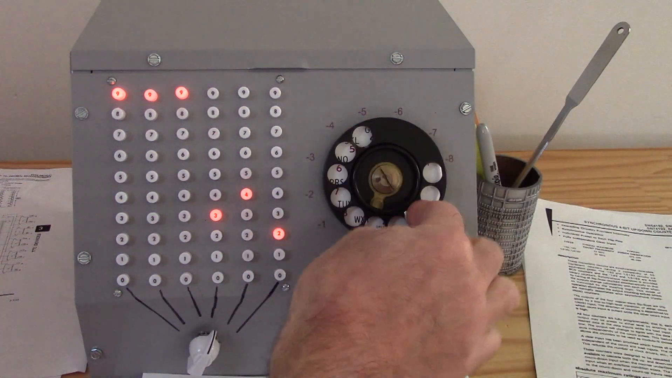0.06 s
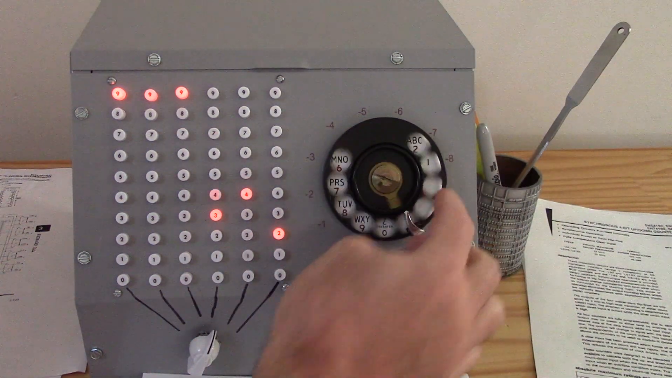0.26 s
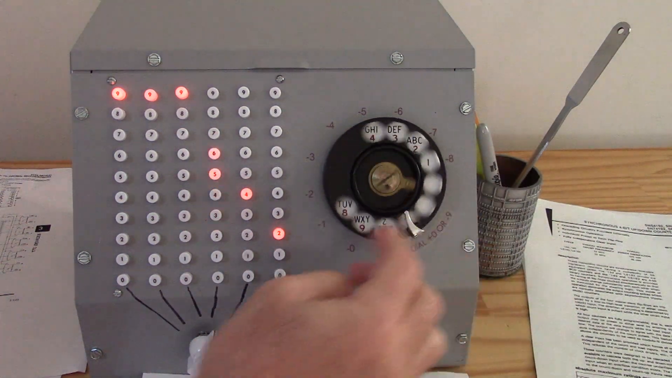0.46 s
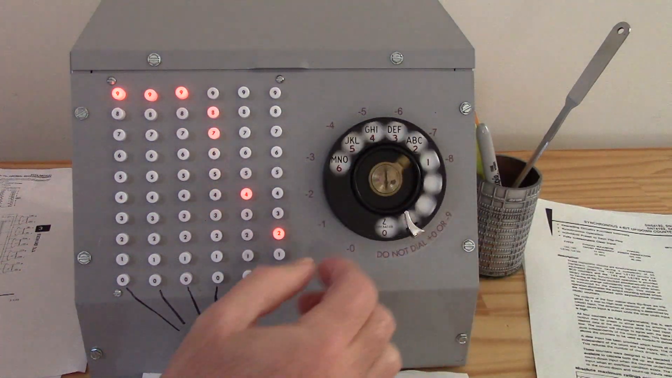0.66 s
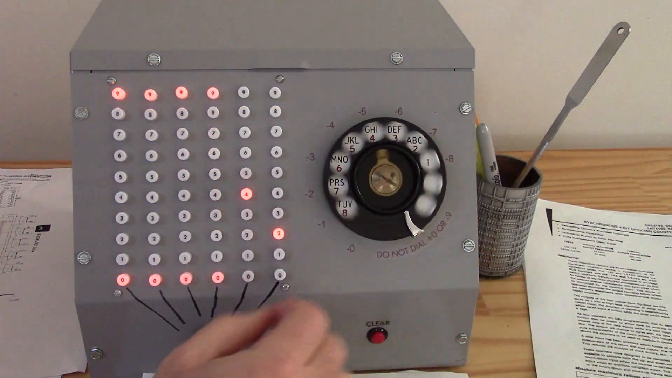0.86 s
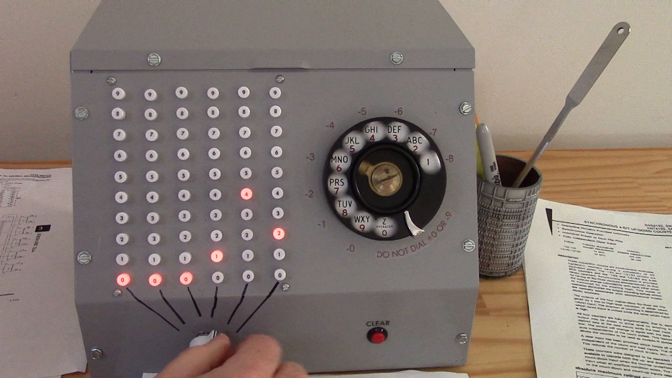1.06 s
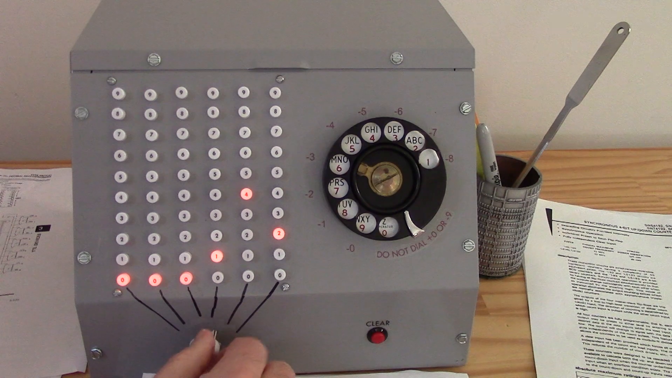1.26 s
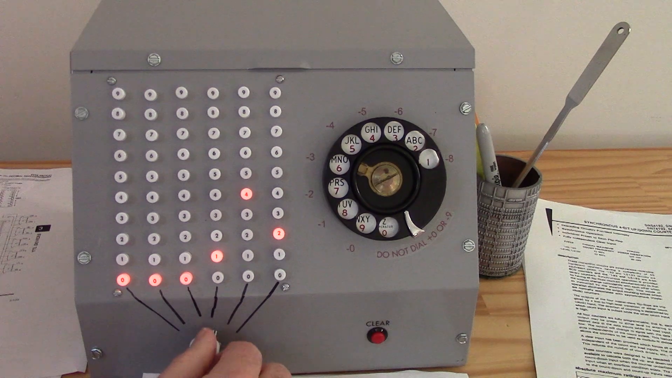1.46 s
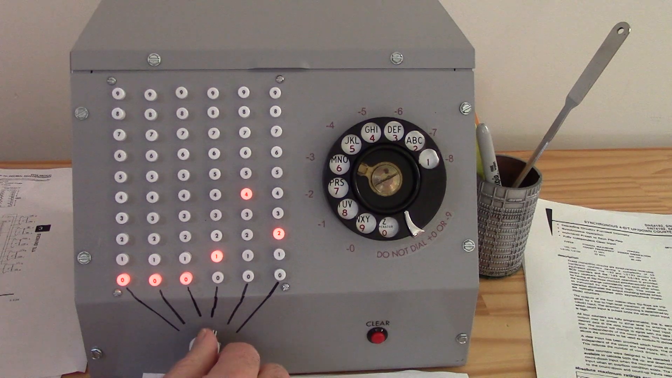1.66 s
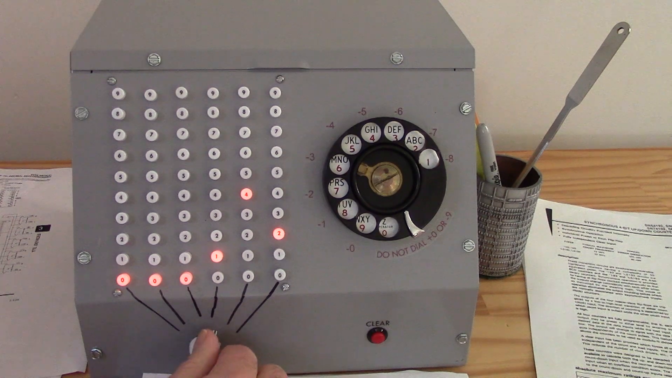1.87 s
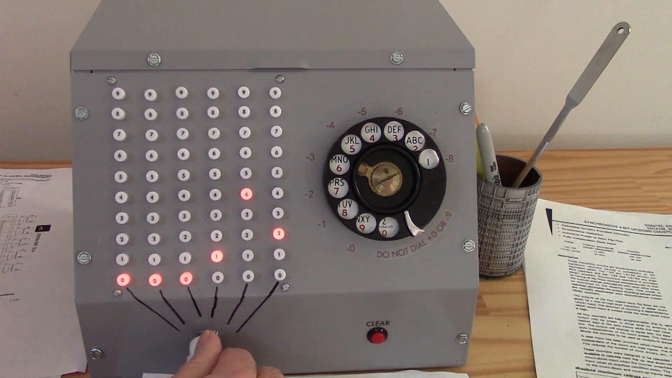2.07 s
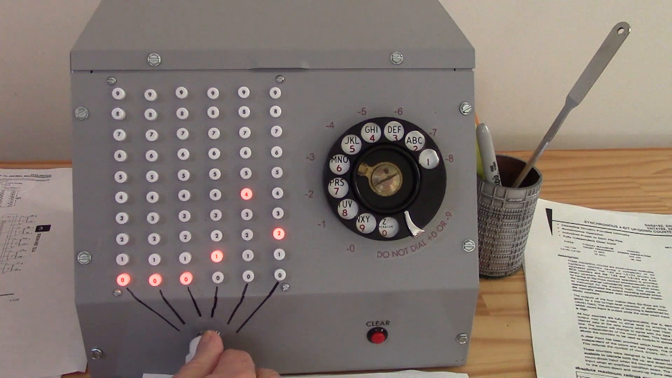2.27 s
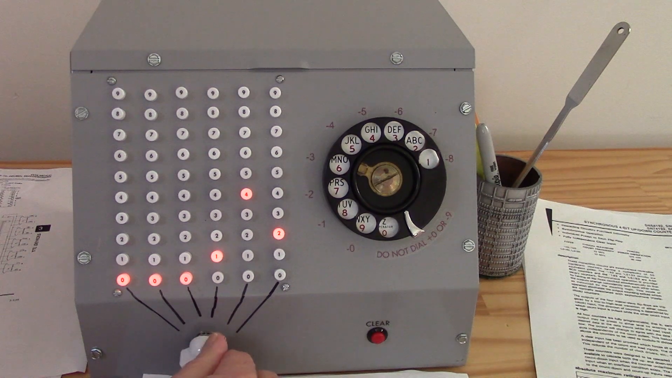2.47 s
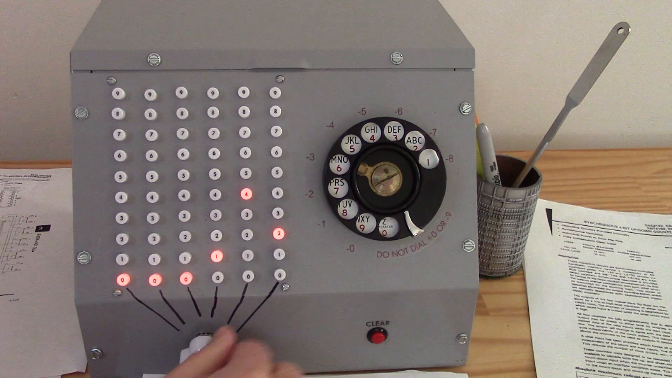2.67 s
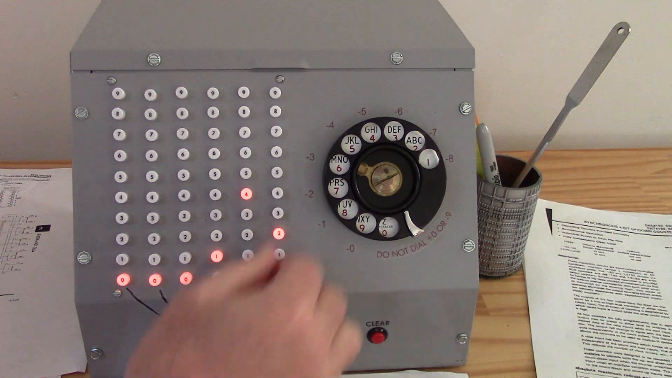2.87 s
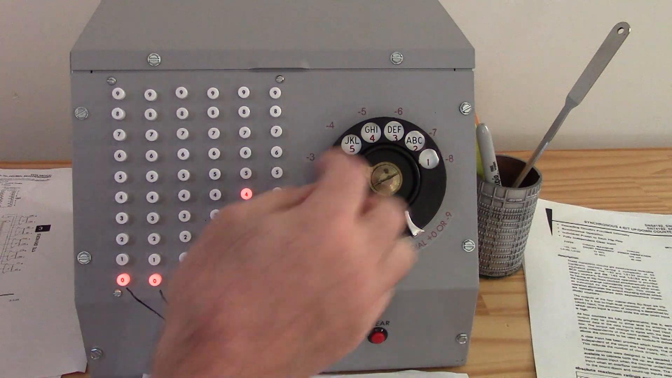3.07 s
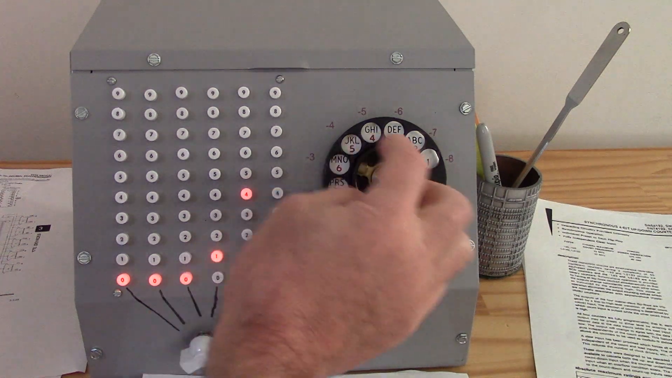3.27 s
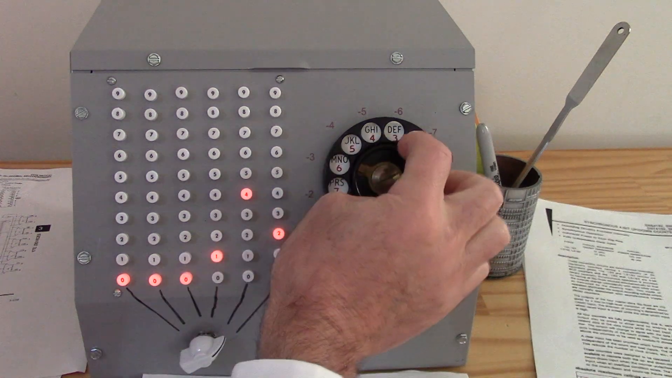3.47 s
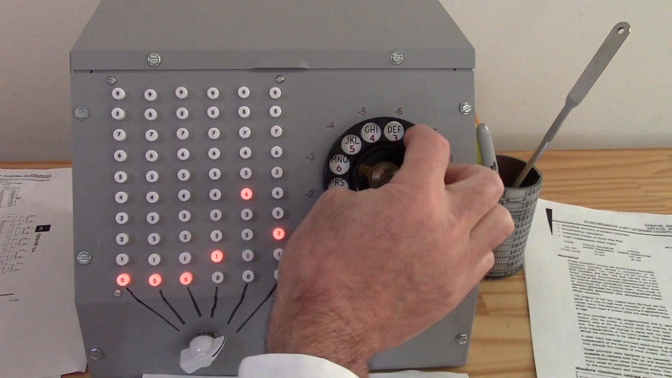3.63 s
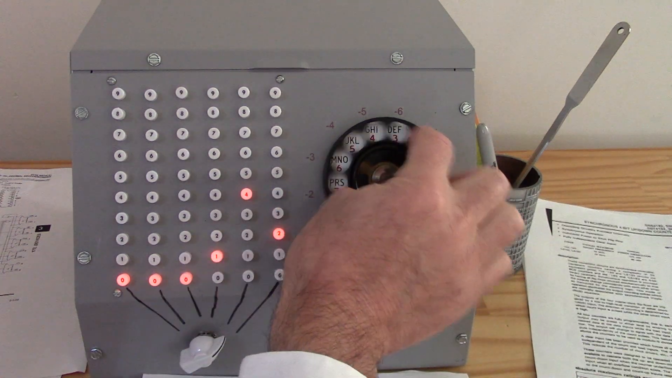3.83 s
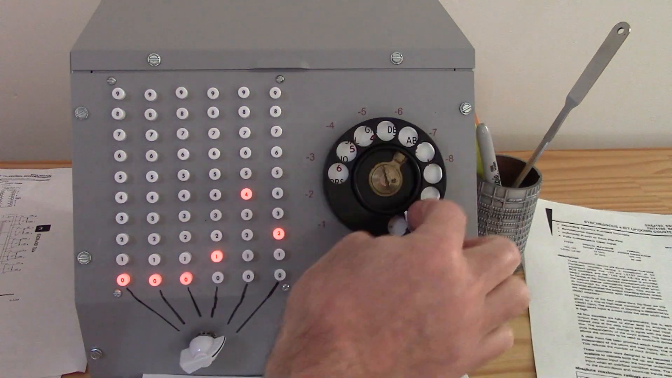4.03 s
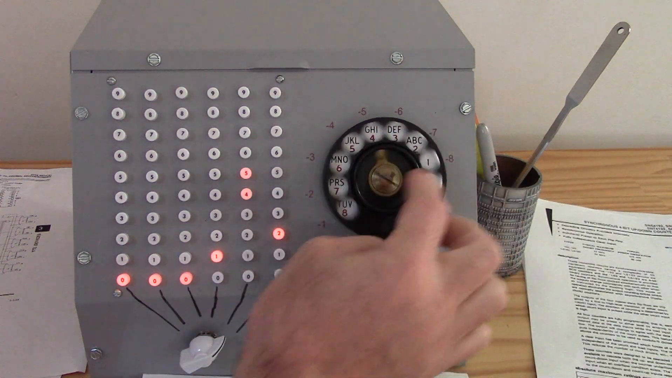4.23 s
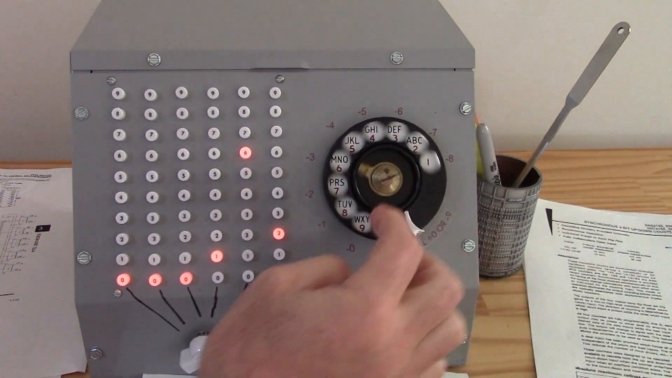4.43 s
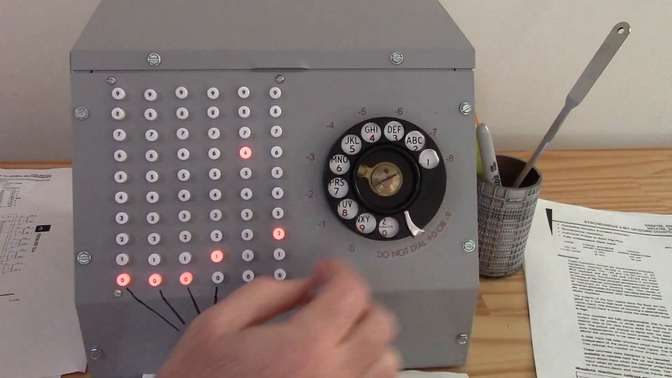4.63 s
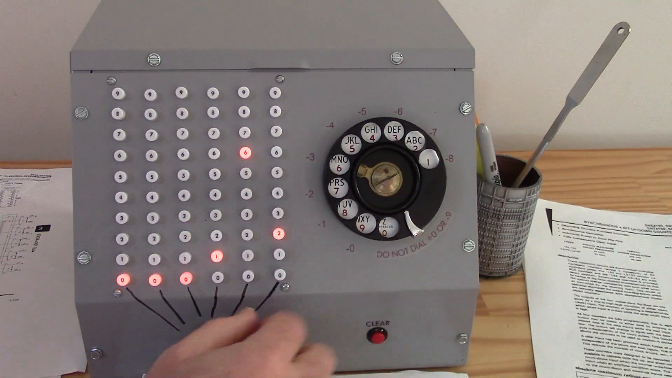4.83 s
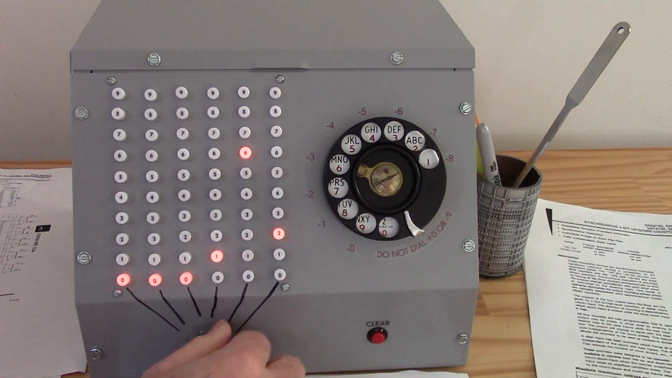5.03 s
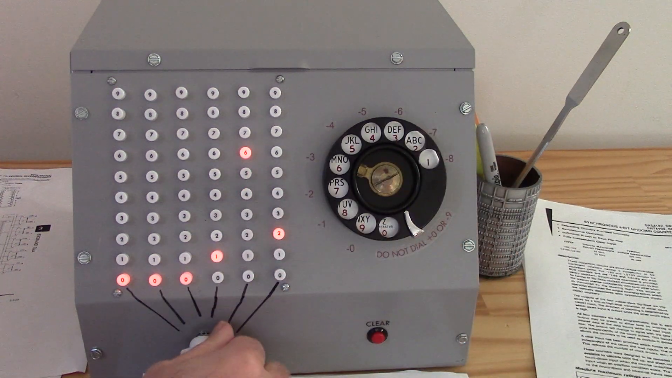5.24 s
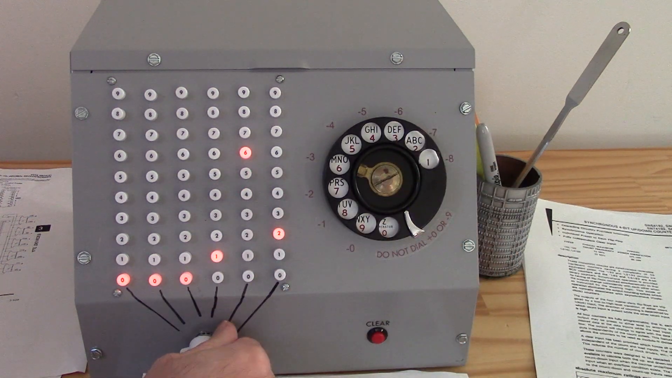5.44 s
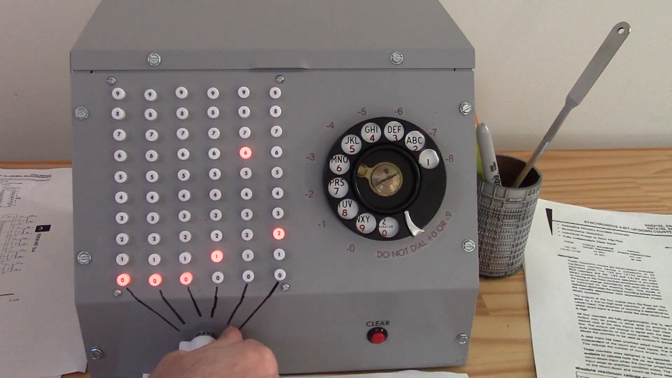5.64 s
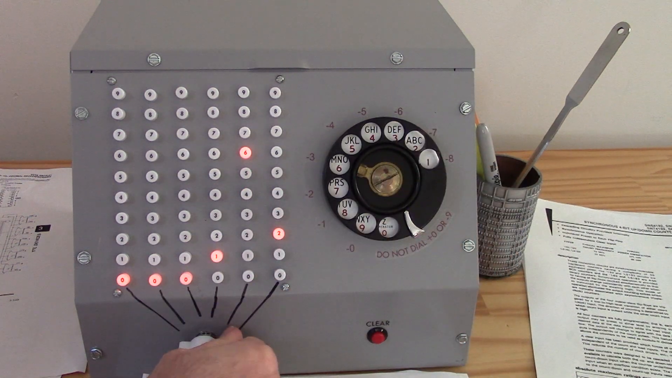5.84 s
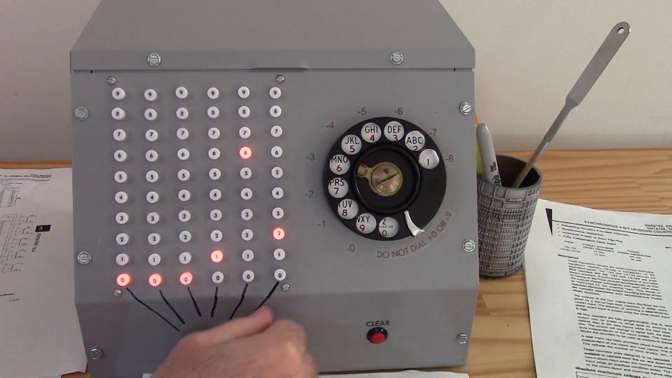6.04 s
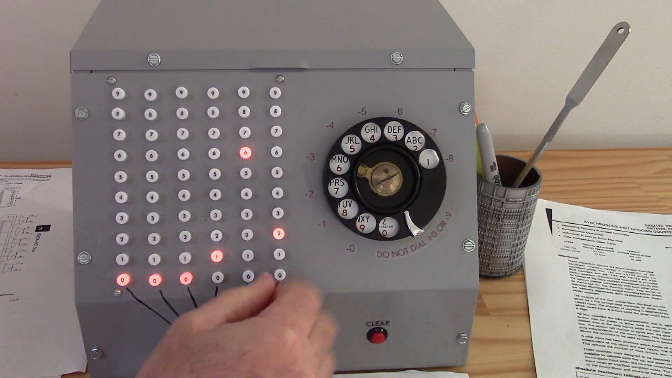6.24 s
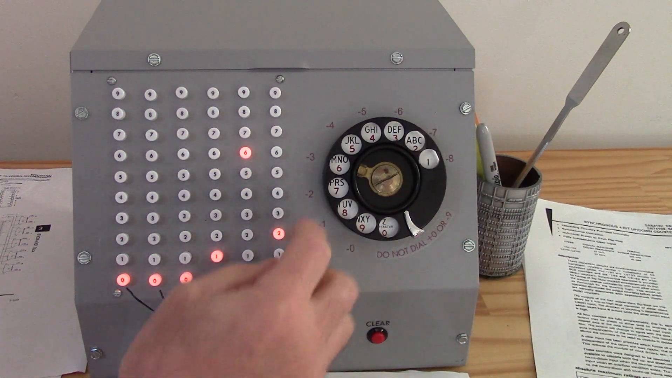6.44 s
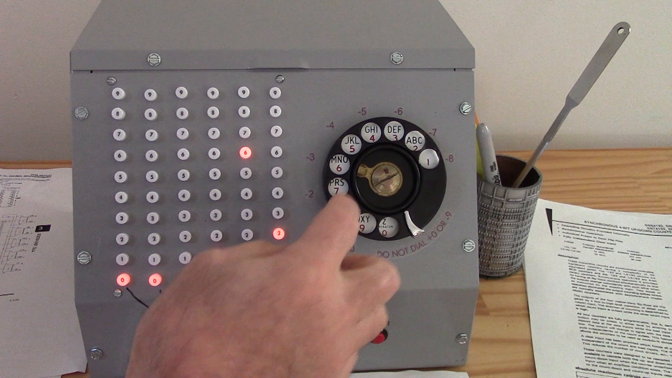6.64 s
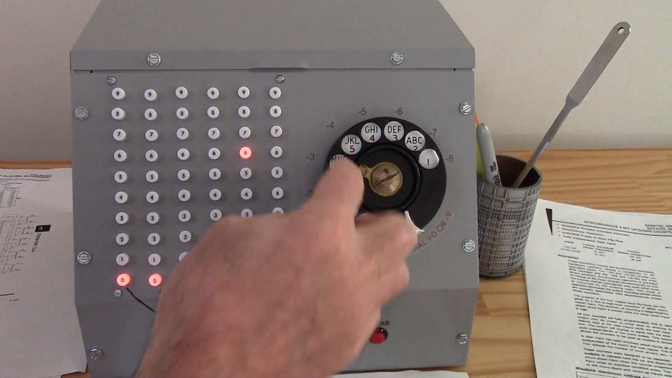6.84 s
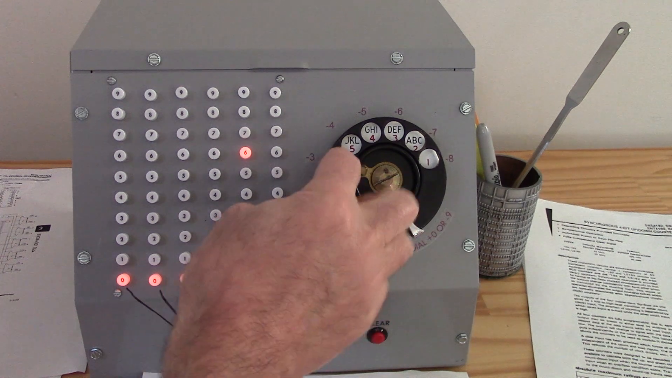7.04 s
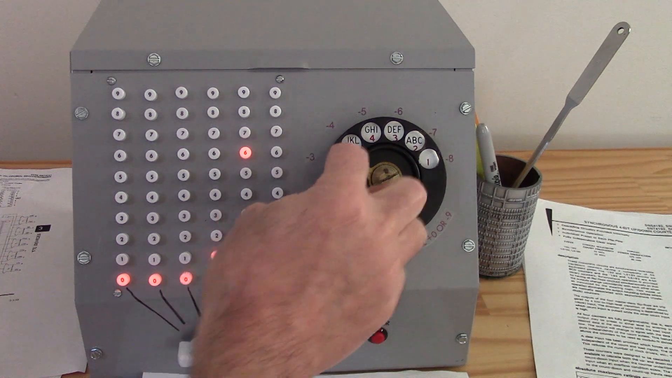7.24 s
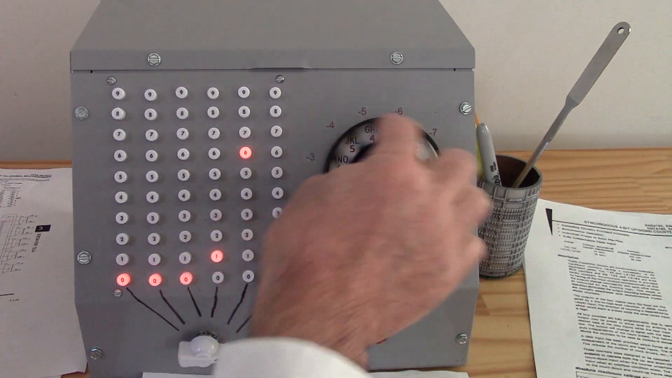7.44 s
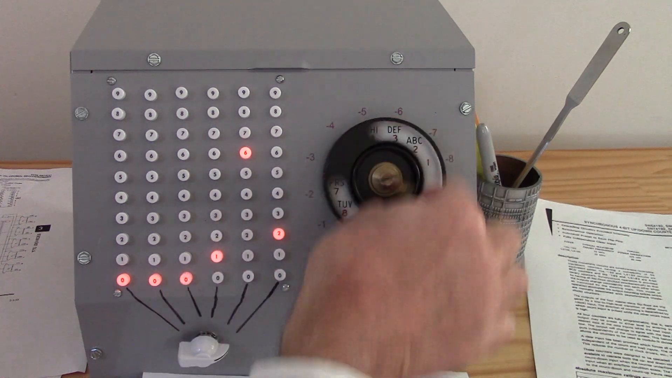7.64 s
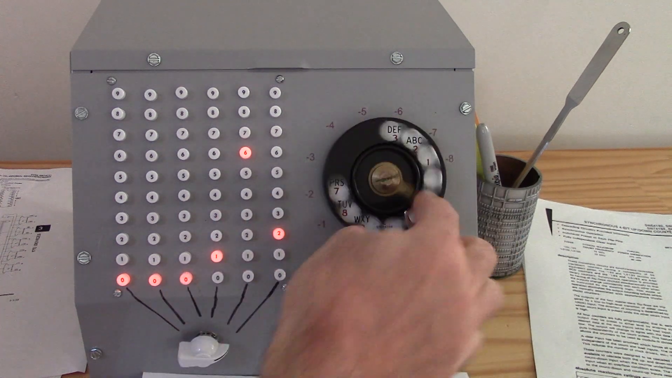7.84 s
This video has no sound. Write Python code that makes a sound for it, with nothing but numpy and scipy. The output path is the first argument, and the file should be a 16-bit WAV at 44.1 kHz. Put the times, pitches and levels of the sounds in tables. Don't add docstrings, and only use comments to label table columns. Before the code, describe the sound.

Close stereo microphones in a quiet, faintly humming room. A finger winds a rotary dial on a sheet-metal box to a hard clack, and it whirs back with rapid ticking, ending in a clunk. A stiff knob creaks in jerks and snaps loudly into place. The dial makes a much shorter return, the knob turns again, and a final winding hits the stop.

```python
import sys
import numpy as np
from scipy import signal
from scipy.io import wavfile
from scipy.ndimage import uniform_filter1d

SR = 44100
rng = np.random.default_rng(int(sys.argv[2]) if len(sys.argv) > 2 else 0)


def nominal_scale(level):
    x = np.asarray(level, float) / 20
    return 10 ** x


def wav_record(signal):
    frames = np.transpose(np.atleast_2d(signal))
    bounded = np.clip(frames, -1, 1)
    quanta = np.round(bounded * 32767).astype(np.int16)
    wavfile.write(sys.argv[1], SR, quanta)


N = 348372


def evened(x):
    return x / np.sqrt(np.mean(x ** 2) + 1e-20)


def read(points, hz):
    f, value = np.transpose(points)
    return np.interp(np.log(hz + 1), np.log(f + 1), value)


def add(mix, s, sound):
    part = mix[..., round(s * SR):][..., :sound.shape[-1]]
    part += sound[..., :part.shape[-1]]


def impulses(events, offset_db=0):
    push = np.zeros(N)
    for s, db in events:
        add(push, s, nominal_scale(np.array([db + offset_db])))
    return push


def slow_noise(length):
    return evened(uniform_filter1d(rng.standard_normal(N), length))


def colour(x, points):
    log_gain = np.log(nominal_scale(read(points, abs(np.fft.fftfreq(2048, 1 / SR)))))
    taps = np.fft.ifft(np.exp(np.conj(signal.hilbert(log_gain)))).real[:1024]
    return signal.oaconvolve(x, taps / np.linalg.norm(taps))[:len(x)]


def high_pass(x, order, hz):
    return signal.sosfilt(signal.butter(order, hz, "high", fs=SR, output="sos"), x)


def resonate(x, hz, width):
    r = np.exp(-np.pi * width / SR)
    return 2 * signal.lfilter([1 - r], [1, -r * np.exp(2j * np.pi * hz / SR)], x).real


def resonate_twice(x, hz, width):
    return resonate(resonate(x, hz, width), hz, width)


def ring(x, modes, split=0, sign=-1):
    t, answer = np.arange(16000) / SR, 0
    for k, (hz, db, t60) in enumerate(modes):
        trio = hz * (1 + split * rng.uniform(-0.55, 1, (3, 1)))
        decay = nominal_scale(db - 60 * t / t60)
        answer = answer + sign ** k * decay * np.sin(2 * np.pi * trio * t).sum(0)
    first_10_ms = answer[:441]
    return signal.oaconvolve(x, answer / np.std(first_10_ms))[:len(x)]


def pulses(rate, scatter_db):
    turns = np.floor(np.cumsum(rate) / SR)
    return np.diff(turns, prepend=turns[0]) * nominal_scale(scatter_db * rng.standard_normal(len(rate)))


def rattle(length):
    t = np.arange(3000) / SR
    impacts = rng.standard_normal((4, 3000)) * nominal_scale(2.5 * rng.standard_normal(3000))
    impacts *= np.exp(-t / length) * (0.29 + np.clip(t / (0.44 * length), 0, 1) ** 3)
    return impacts / np.linalg.norm(impacts, axis=1, keepdims=True)


# (frequency [Hz], density [dB per Hz])
AIR = [(15, -53.5), (25, -24), (64, -20.5), (89, -8), (117, -11.5), (212, -0.5), (301, -0.5), (591, -2.5),
       (936, -6), (1370, -7), (1560, -9), (3430, -15), (6050, -18.5), (13600, -27.5), (16000, -37)]
# (frequency [Hz], coherence [0-1])
COHERENCE = [(60, 0.33), (240, 0.41), (950, 0.72), (3770, 0.79), (15000, 1)]
# (frequency [Hz], width [Hz], level [dB])
HUMS = [(116, 10, -80)]
AIR_DB, MAINS_HZ, MAINS_DB = -58.5, 117, -72
WHINE_HZ, WHINE_DB, WHINE_SWING_DB, WHINE_S = 5562, -92, 4, .04


def air():
    frames, hz = N // 256 + 5, np.fft.rfftfreq(1024, 1 / SR)
    a, b, c, d, patches = rng.standard_normal((frames, 513, 5)).T
    patches = evened(uniform_filter1d(uniform_filter1d(patches, 12, 0), 14, 1))
    same = np.clip(read(COHERENCE, hz), -1, 1)[:, None]
    left = a + 1j * b
    right = same * left + np.sqrt(1 - same ** 2) * (c + 1j * d)
    z = np.array([left, right]) * nominal_scale(read(AIR, hz)[:, None] + 1.5 * patches)
    hiss = nominal_scale(AIR_DB) * evened(signal.istft(z, nperseg=1024, noverlap=768)[1][:, :N])
    hums = sum(nominal_scale(db) * evened(resonate_twice(rng.standard_normal(N), f, w)) for f, w, db in HUMS)
    span = round(WHINE_S * SR)
    flicker = evened(uniform_filter1d(uniform_filter1d(rng.standard_normal(N), span), span))
    whine = evened(resonate(rng.standard_normal(N), WHINE_HZ, 25))
    whine = nominal_scale(WHINE_DB + WHINE_SWING_DB * flicker) * whine
    mains = nominal_scale(MAINS_DB) * np.sqrt(2) * np.sin(2 * np.pi * MAINS_HZ * np.arange(N) / SR)
    return hiss + hums + mains + whine


# (time [s], crack level [dB], box level [dB], finger plate level [dB], crack centre [Hz])
TAPS = [(0.0024, -48, -65, -52.5, 3340), (0.04, -43.5, -49, -40, 3130), (0.0871, -62, -54, -51.5, 3060),
        (3.4359, -30.5, -42.5, -27.5, 3660), (3.4486, -50, -53, -39, 3100), (3.59, -33.5, -42, -38, 2900),
        (3.5949, -34, -56.5, -52, 7600), (4.0529, -30.5, -43, -37, 6780), (6.5844, -32, -60, -69, 4860),
        (7.7235, -41.5, -54, -51, 7940), (7.7375, -43.5, -56, -47.5, 3380)]
# (time [s], crack level [dB], box level [dB], small panels re box [dB], stop ring level [dB])
STOPS = [
    (0.2468, -5, -20.5, 0.5, -11),
    (4.2026, -2.5, -18.5, -4, -7.5),
    (7.8886, -4.5, -28, 8.5, -12.5),
]
# (time [s], back plate level [dB], box level [dB], crack level [dB], rebound level [dB])
HOMES = [
    (1.1406, -34, -36, -33, -33.5),
    (4.5081, -24, -32.5, -35, -29.5),
]
# (time [s], crack level [dB], box level [dB], small panels re box [dB], crack centre [Hz])
DETENTS = [
    (2.2871, -70, -63.5, 20.5, 3030),
    (2.4400, -13, -32, 12, 10500),
    (2.789, -69, -56.5, 10, 2725),
    (5.529, -62.5, -58, -3, 2887),
    (5.6178, -18.5, -28, -11, 7800),
]
STOP_SMALL_LAG_S, HOME_RATTLE_S = .002, .003


def strikes():
    rows = []
    for s, crack, box, small, _ in STOPS:
        rows.append((s, crack, box, box + small, crack - 25.5, 7200, 0, 0, -7.5, STOP_SMALL_LAG_S, 0))
    for s, _, box, crack, _ in HOMES:
        rows.append((s, crack, box, box - 6, box - 8, 7060, 0, 15, -8, 0, HOME_RATTLE_S))
    for s, crack, box, plate, hz in TAPS:
        rows.append((s, crack + 4.5, box, box, plate, hz, 0, -7, 0, 0, 0))
    for s, crack, box, small, hz in DETENTS:
        rows.append((s, crack, box, box + small - 5, box - 15, hz, 1, 1.5, 0, 0, 0))
    return rows


# (time [s], level [dB])
THUDS = [(7.0355, -47), (3.586, -46), (5.625, -38)]
# (frequency [Hz], density [dB per Hz])
CRACK = [(880, -28.5), (1500, -8.5), (2150, -8), (2550, -12), (5130, -14.5), (6520, -8.5), (6920, -5.5),
         (13900, -19.5), (15400, -25.5), (16400, -40)]
LOW_PANELS = [(115, -16, 0.77), (175.9, -4.5, 0.5), (195.1, 1, 0.4), (250, -2.5, 1), (283, -1, 0.2),
              (340.5, -5.5, 0.24), (424, -2, 0.11), (530, -4.5, 0.039), (616, 3, 0.064)]
KNOB_PANELS = [(167, -14.5, 0.52), (250, 1, 0.17), (290, 0, 0.12), (365, 4.5, 0.12), (416, 0.5, 0.14),
               (478, 11.5, 0.047), (495, 8, 0.075), (575, -4, 0.11)]
SMALL_PANELS = [(730, -8, .05), (820, -3, .05), (900, -3, .05), (990, 0, .06), (1070, -.5, .06),
                (1160, -3, .06), (1265, -6, .05), (1400, -10, .04), (1660, -8, .04), (1940, -9, .04),
                (2360, -15, .03)]
PLATE = [(2030, 6, .018), (2143, 9, .024), (2090, -18, .06), (1437, -7, .035), (626, -8, .06),
         (3700, -9, .02), (3000, -7, .02)]
STOP = [(6377, 0, .125), (6377, -24, .6), (6555, -14, .08)]
SHORTEST_S, SOFT_DB = .0013, -19
STOP_LAG_S = 0.0041


def blows():
    broad, small, bright, plate, stop = np.zeros((5, N))
    low = np.zeros((2, N))
    for s, crack_db, low_db, small_db, plate_db, hz, place, wide_db, spot_db, lag_s, extra_s in strikes():
        force = np.sqrt(nominal_scale(crack_db))
        hit = rattle(extra_s + SHORTEST_S + 0.0085 * force)
        smoothing = 3 if crack_db < SOFT_DB else 1
        add(broad, s, nominal_scale(crack_db + wide_db) * uniform_filter1d(hit[0], size=smoothing))
        thud = rattle(0.00037 + 0.0032 * force)
        add(low[place], s, nominal_scale(np.array([low_db])))
        add(small, s + lag_s, nominal_scale(small_db) * thud[2])
        add(bright, s, nominal_scale(crack_db + spot_db) * resonate_twice(hit[3], hz, 1500))
        add(plate, s + .0012, nominal_scale(np.array([plate_db])))
    low[0] += impulses(THUDS)
    for s, *_, db in STOPS:
        add(stop, s + STOP_LAG_S, nominal_scale(np.array([db])))
    crack = nominal_scale(17.5) * colour(broad, CRACK) + nominal_scale(24.5) * bright
    panels = nominal_scale(-7.0) * ring(low[0], LOW_PANELS, 0.018)
    panels += nominal_scale(2.0) * ring(low[1], KNOB_PANELS, 0.0093)
    panels += nominal_scale(2.0) * high_pass(ring(small, SMALL_PANELS, 0.036, 1), 2, 350)
    held_plate = nominal_scale(-0.5) * ring(plate, PLATE)
    return crack + bodies() + panels + nominal_scale(-9) * ring(stop, STOP), held_plate


# (frequency [Hz], t60 [s])
WALLS = [(150, 0.6), (500, 0.45), (1500, 0.5), (4000, 0.2), (9000, 0.5), (15000, .22)]
# (frequency [Hz], level [dB])
ECHO = [(150, -3), (500, -1), (1000, -5), (2100, -7.5), (4000, -8.5), (9000, -16), (15000, -16.5)]
# (frequency [Hz], share [0-1])
APART = [(100, .03), (500, 0.038), (2000, 0.048), (6000, 0.18), (14000, .25)]


def walls(x):
    hz, t, z = signal.stft(rng.standard_normal((2, SR * 3 // 4)), SR, nperseg=256)
    t60 = read(WALLS, hz)[:, None]
    unit_energy = np.sqrt(6 * np.log(10) / (t60 * SR))
    z = z * nominal_scale(read(ECHO, hz)[:, None] - 60 * t / t60) * unit_energy
    z = z * np.array([np.ones(len(hz)), read(APART, hz)])[:, :, None]
    mid, side = signal.istft(z, SR, nperseg=256)[1]
    tail = np.pad([mid + side, mid - side], ((0, 0), (180, 0)))
    return signal.fftconvolve(x[None], tail, axes=1)[:, :N]


# (time [s], level [dB])
FLICKS = [
    (0.042, -59),
    (3.4375, -45.5),
    (3.592, -56.5),
]
# (time [s], level [dB])
SLIPS = [(1.86, -42), (1.987, -36), (1.994, -36), (2.042, -34), (2.09, -34), (2.108, -34), (2.124, -39),
         (2.144, -40), (2.185, -42), (5.234, -42), (5.292, -32), (5.332, -34), (5.349, -35), (5.381, -31),
         (5.428, -37), (5.853, -36), (5.886, -32), (6.012, -40)]
# (time [s], level [dB])
RIM_KNOCKS = [(4.0535, -40), (7.8915, -19.5)]
LID_KNOCKS = [(7.8905, -21)]
FREE_PLATE = [(2130, 1, 0.4), (2080, -5.5, 0.27), (2290, -7, 0.38), (8350, -24, .12), (6200, -22.5, .12),
              (6450, -22, .1)]
STOP_BODY = [(603.7, -23.5, .12), (754, -8, 0.018), (973, -14.5, 0.11), (2230, -3, 0.08),
             (3035, -12, 0.064), (3505, -9, 0.035), (4470, -16.5, 0.045), (5450, -12, 0.039),
             (7600, -9.5, 0.041), (7400, -15, 0.03), (8100, -8, 0.04), (8450, -15.5, 0.099),
             (9990, -4.5, 0.041), (10750, -5.5, 0.038)]
HOME_BODY = [(813, -20, 0.41), (892, -18, 0.055), (1003, -1, 0.039), (1062, 5, 0.055), (1173, -4.5, 0.045),
             (1270, -9, .07), (1480, -20, 0.26), (1680, -11.5, 0.1), (1750, -8, 0.096), (2020, -17, 0.049),
             (2750, -7, 0.088), (3200, -8, 0.13), (3820, -26, .06)]
GRIP_SMALL = [(858, -1.5, 0.041), (1016, 1.5, .035), (1121, -3, 0.021), (1310, -15.5, 0.088),
              (1660, -13, 0.014), (2100, -17, 0.018), (2820, -23.5, .006)]
DETENT_BODY = [(598, -26, 0.17), (795, -18, 0.05), (1400, -10, 0.023), (1016, -5, 0.033), (1436, -25, 0.16),
               (1606, -12, .2), (2020, -1.5, 0.042), (7946, -14, 0.02)]
RIM = [(1062, 1, 0.054), (1200, -7, 0.035), (965, -6, .05), (1230, -9.5, 0.047)]
LID = [(804, -0.5, .04), (860, -3.5, 0.055)]
STOP_BODY_DB = [-10, -20, -14.5]
REBOUND_S, DETENT_LAG_S = .0108, 0.001955


def bodies():
    stop, home, detent = np.zeros((3, N))
    for (s, db, *_), body_db in zip(STOPS, STOP_BODY_DB):
        add(stop, s + .001, nominal_scale(db + body_db) * rattle(0.0064)[0])
    for s, db, *_, rebound_db in HOMES:
        add(home, s + REBOUND_S, nominal_scale(rebound_db) * np.hanning(22) / 7)
        add(home, s, nominal_scale(db) * np.hanning(20) / 7)
    for s, db, *_ in DETENTS:
        add(detent, s + DETENT_LAG_S, nominal_scale(db - 6) * rattle(0.0013)[0])
    rung = ring(impulses(FLICKS), FREE_PLATE)
    rung += ring(stop, STOP_BODY, .02)
    rung += ring(home, HOME_BODY, 0.019, 1.0)
    rung += ring(impulses(SLIPS, offset_db=-13.5), GRIP_SMALL, 0, 0.82)
    rung += nominal_scale(-2.5) * ring(detent, DETENT_BODY, 0.028)
    rung += ring(impulses(RIM_KNOCKS), RIM, 0, 0.97)
    rung += ring(impulses(LID_KNOCKS), LID, 0, 1)
    return high_pass(rung, 2, 350)


def pressure(rows):
    t, power = np.arange(0, N + 64, 64) / SR, 0
    for s, rise, fall, db in rows:
        away = np.minimum(np.where(t < s, (s - t) / rise, (t - s) / fall), 4)
        power = power + nominal_scale(db - 45 * away ** 2) ** 2
    return np.interp(np.arange(N) / SR, t, np.sqrt(power))


# (peak time [s], rise [s], fall [s], pressure [dB])
DIAL_GRIPS = [(.11, 0.14, 0.14, -54.5), (3.62, 0.2, 0.15, -46), (3.75, 0.11, 0.075, -60),
              (3.9, 0.091, 0.37, -57.5), (4.08, 0.027, 0.062, -47.5), (6.32, 0.11, 0.21, -67.5),
              (6.42, 0.041, 0.15, -70), (7.045, 0.01, 0.18, -53), (7.18, 0.084, 0.3, -58),
              (7.42, 0.14, 0.49, -59.5), (7.735, 0.028, 0.14, -43.5), (7.86, 0.11, 0.099, -46.5)]
KNOB_GRIPS = [(1.19, 0.028, 0.47, -51.5), (1.67, 0.038, 0.23, -52), (1.81, 0.065, .12, -54),
              (1.9, 0.094, 0.28, -41), (2.025, 0.16, 0.2, -35.5), (2.3, 0.03, 0.078, -45),
              (2.435, 0.015, 0.01, -34), (2.6, 0.048, 0.24, -52.5), (2.79, 0.044, 0.069, -50.5),
              (5.25, 0.062, 0.11, -44.5), (5.3, 0.02, 0.093, -36.5), (5.35, 0.093, 0.15, -35.5),
              (5.435, 0.034, 0.049, -40), (5.535, 0.02, 0.03, -39.5), (5.587, 0.012, 0.12, -40.5),
              (5.69, .06, 0.44, -51), (5.89, 0.1, 0.072, -36.5), (5.925, 0.071, 0.015, -43),
              (6.065, 0.073, 0.077, -48.5)]
# (peak time [s], rise [s], fall [s], level [dB])
RUBS = [(.21, 0.064, 0.27, -61), (1.2, .03, 0.26, -56), (2.03, 0.14, 0.087, -67.5),
        (2.425, 0.073, 0.035, -70.5), (2.72, 0.07, .12, -59.5), (2.6, .1, 0.14, -62.5),
        (3.91, 0.17, 0.31, -76.5), (4.04, 0.35, 0.069, -65), (5.2, 0.098, .15, -62.5),
        (5.31, 0.1, 0.17, -53), (5.7, 0.079, 0.26, -58), (5.89, 0.13, 0.069, -65), (5.97, 0.067, .2, -65),
        (6.3, 0.032, 0.1, -59), (6.5, 0.035, 0.17, -59.5), (7.365, 0.018, 0.039, -56),
        (7.725, 0.33, 0.075, -67), (7.86, 0.073, 0.3, -65)]
# (frequency [Hz], density [dB per Hz])
SKIN = [(880, -37.5), (1500, -6.5), (2130, -8.5), (3300, -7.5), (4000, -11.5), (8040, -8), (15000, -25),
        (16400, -33)]
# (frequency [Hz], level [dB], t60 [s])
GRIP_LOW = [(190, -6.5, 0.093), (270, -0.5, 0.09), (355, -0.5, 0.11), (457, 3.5, 0.047), (629, -4, 0.054)]
KNOB_SMALL_DB, DIAL_SMALL_DB = -2.5, -14.5
LUMP_S, LUMP_DB = .025, 1.6


def touch():
    knob, finger = pressure(KNOB_GRIPS), pressure(DIAL_GRIPS)
    slip_rate = 125 * np.exp(.35 * slow_noise(300))
    slips = evened(pulses(slip_rate, scatter_db=2.6)) + .5 * rng.standard_normal(N)
    slips = slips * nominal_scale(LUMP_DB * slow_noise(round(LUMP_S * SR)))
    low = high_pass(ring(slips, GRIP_LOW), 3, 150)
    grain = nominal_scale(1.3 * slow_noise(120))
    skin = evened(colour(grain * rng.standard_normal(N), SKIN))
    small = nominal_scale(KNOB_SMALL_DB) * knob + nominal_scale(DIAL_SMALL_DB) * finger
    small = small * evened(ring(slips, GRIP_SMALL))
    scuff = nominal_scale(-17.5) * knob * evened(resonate_twice(skin + .7 * slips, 2150, 800))
    scuff += nominal_scale(-22) * knob * evened(resonate_twice(slips, 3400, 700))
    lid_flex = nominal_scale(2) * finger * evened(resonate_twice(slips, 181.6, 76))
    return nominal_scale(-5.5) * ((knob + finger) * evened(low) + small + lid_flex + scuff) + pressure(RUBS) * skin


TICKS = [(1.514, -54, 2380, -20), (2.184, -64, 1983, -25), (3.0786, -47, 2280, -22.5),
         (3.1925, -62, 2060, -29), (3.246, -46, 2350, -34.5), (3.911, -38.5, 9940, -26),
         (4.894, -47, 3070, -17), (5.071, -48, 3130, -23), (5.185, -59, 2440, -28.5),
         (6.039, -44, 7200, -5), (6.5093, -38, 7100, -22), (6.5214, -36, 7200, -28),
         (6.5322, -43, 7400, -28), (7.37, -37.5, 9730, -20),
         (0.223, -30, 8500, -24), (1.106, -31, 7600, -38), (3.572, -54, 7950, -4.5),
              (4.178, -33, 7800, -33), (5.58, -57.5, 2220, 7), (6.5568, -37.5, 6800, -23.5),
              (6.575, -41, 5970, -33), (7.844, -51, 8620, -4.5),
         (1.142, -22, 8900, -30), (1.146, -31, 7400, -30), (1.1495, -30, 9000, -30),
              (4.5073, -32, 9000, -26.5), (4.5098, -25.5, 8540, -28), (4.513, -19, 9100, -30),
              (4.519, -34, 8500, -30), (4.055, -31, 10800, -25), (4.0545, -32, 3260, -22),
              (4.0668, -40, 8000, -20.5)]


def ticks():
    snaps, push = np.zeros((2, N))
    for s, db, hz, share_db in TICKS:
        hit = nominal_scale(db) * rattle(0.00045)
        add(snaps, s, nominal_scale(20.5) * resonate_twice(hit[0], hz, 3000))
        add(push, s, nominal_scale(share_db) * hit[2])
    return snaps + ring(push, GRIP_SMALL)


# (start [s], end [s], level [dB])
RUNS = [
    (0.281, 1.141, -41),
    (4.241, 4.507, -41.5),
]
# (time [s], rate [turns per s])
SPEED = [(.3, 94.5), (.5, 93.2), (.7, 91), (.9, 89), (1.14, 84.7), (4.25, 88), (4.51, 83.5)]
# (time [s], level [dB])
BITE = [(.3, -5), (.45, -6), (.58, -1.5), (.66, -7.5), (.79, 0), (.86, -8), (.91, -2.5), (.94, -5),
        (1.0, 1), (1.06, -14), (1.11, -2), (4.25, -2), (4.36, -1.5), (4.4, -7), (4.5, -7)]
# (frequency [Hz], width [Hz], level [dB])
TICK = [(2800, 300, -4.5), (4830, 300, -6.5), (5760, 93, -11.5), (6660, 70, 1.5), (7300, 280, 2.5),
        (7600, 320, -1.5), (8200, 150, 1), (9600, 200, -9.5), (10500, 200, -7)]
GEAR_RINGS = [(1810, 60, 0), (2110, 90, 0.5), (2646, 61, 1), (3000, 131.2, -1.5), (3130, 52, 2),
              (3520, 46, -2), (3790, 25, -3.5), (4030, 29, -4), (4620, 160, -4), (5140, 92, -2),
              (5650, 120, -4), (6620, 45, 4), (7800, 98, 0), (10200, 90, -7.5)]
# (frequency [Hz], density [dB per Hz])
GEARS = [(71, -69), (120, -33.5), (177, -4), (322, -19), (438, -10), (661, -18), (733, -11), (1200, -14.5),
         (3030, -13), (4150, -19), (4600, -14.5), (6900, -14.5), (13000, -33.5), (16400, -51.5)]
TICK_DB, RUB_SAG_DB_PER_S = -2.16, -4
WOBBLE_DB, WOBBLE_HZ, WOBBLE_WIDTH_HZ, WOBBLE_OFF_DB = -8.5, 177, 9.1, -20.5
RING_DRIFT_S, RING_DRIFT_DB = .06, 2.5
RING_BITE = .6


def dial(s, end, db):
    t = np.arange(s, end, 1 / SR)
    fade = signal.windows.tukey(len(t), 0.0064 / (end - s))
    rate = np.interp(t, *np.transpose(SPEED))
    tick_db = db + TICK_DB + np.interp(t, *np.transpose(BITE))
    rub_db = db + 1.0 + RUB_SAG_DB_PER_S * (t - s)
    detuning = (2 * rate - WOBBLE_HZ) / WOBBLE_WIDTH_HZ
    wobble_db = db + WOBBLE_DB + WOBBLE_OFF_DB * np.minimum(detuning ** 4, 1)
    rate[0] -= .13 * SR
    turns, noise = np.cumsum(rate) / SR, rng.standard_normal((2, len(rate)))
    scrape = pulses(rate, scatter_db=1.6) + noise[0] * (.02 + .08 * np.exp(-(turns % 1) / .08))
    tick = 0
    for k, (hz, width, level) in enumerate(TICK):
        tone = evened(resonate(resonate(scrape, hz, 1.1 * width), hz, 900))
        tick = tick + (-1) ** k * nominal_scale(level) * tone
    edge = evened(resonate_twice(scrape, 7300, 1500))
    ticking = evened(tick) + .6 * edge
    mesh = noise[1] * (1 + 0.28 * np.cos(2 * np.pi * turns))
    drift = rng.standard_normal((len(GEAR_RINGS), len(t)))
    drift = evened(uniform_filter1d(drift, round(RING_DRIFT_S * SR)))
    teeth = (1 - RING_BITE) * mesh + RING_BITE * evened(scrape)
    rings = 0
    for (hz, width, level), swell in zip(GEAR_RINGS, drift):
        rings = rings + nominal_scale(level + RING_DRIFT_DB * swell) * evened(resonate(teeth, hz, width))
    rub = evened(colour(mesh, GEARS)) + .75 * evened(rings)
    wobble = np.sqrt(2) * np.sin(4 * np.pi * turns) + .14 * np.sin(2 * np.pi * turns)
    run = nominal_scale(tick_db - 1.5) * ticking + nominal_scale(rub_db + 0.5) * evened(rub) + nominal_scale(wobble_db) * wobble
    return s, fade * run


DRONE_S, DRONE_END_S = 1.3, 1.95
DRONE_HZ, DRONE_DB, DRONE_T60, DRONE_HOLD_DB = 264.6, -48, 0.27, -67.5


def drone():
    t = np.arange(0, DRONE_END_S - DRONE_S, 1 / SR)
    level = nominal_scale(DRONE_DB - 60 * t / DRONE_T60) + nominal_scale(DRONE_HOLD_DB)
    fade = signal.windows.tukey(len(t), .08)
    return DRONE_S, fade * np.sqrt(2) * level * np.sin(2 * np.pi * DRONE_HZ * t)


# (middle time [s], level [dB])
CHIRPS = [(1.3, -82), (1.43, -76), (1.73, -81), (1.87, -78), (2.0, -79), (2.62, -79), (2.75, -80),
          (3.3, -77), (3.75, -82), (4.97, -79), (5.07, -80), (5.93, -80), (6.03, -79), (6.15, -77),
          (6.36, -82), (6.48, -80), (7.02, -80), (7.15, -78), (7.28, -78)]
CHIRP_HZ, CHIRP_S = 5562, .075


def insect():
    t, out = np.arange(0, CHIRP_S, 1 / SR), np.zeros(N)
    chirp = np.sqrt(2) * signal.windows.tukey(len(t), .5) * np.sin(2 * np.pi * CHIRP_HZ * t)
    for s, db in CHIRPS:
        add(out, s - CHIRP_S / 2, nominal_scale(db + 3) * chirp)
    return out


# (time [s], level [dB], centre [Hz], t60 [s])
SPRINGS = [(2.441, -16, 16000, 0.044), (5.619, -32, 10000, 0.047), (5.62, -49.5, 6000, .5),
           (4.51, -54, 5000, 0.67), (2.442, -22, 7900, .04), (2.444, -39.5, 5600, 0.6),
           (2.443, -49.5, 10000, 0.46), (2.442, -41.5, 1810, 0.65), (5.619, -44.5, 1950, 0.53),
           (5.62, -47, 9600, 0.12), (3.439, -61, 1860, 0.35)]


def spring(s, db, hz, t60):
    t, width = np.arange(SR // 2) / SR, 1100 + 4e-5 * hz ** 2
    fizz = resonate_twice(rng.standard_normal(len(t)), hz, width)
    return s, evened(fizz) * nominal_scale(db - 60 * t / t60)


# (time [s], level [dB])
LURCHES = [(5.822, -46), (5.837, -43), (5.875, -37), (5.899, -37), (5.428, -43), (7.737, -46)]
# (frequency [Hz], level [dB], t60 [s])
LURCH = [(270, 0, .06), (340, -2, .05), (200, -6, .06)]


def lurches():
    push = np.zeros(N)
    for s, db in LURCHES:
        add(push, s, nominal_scale(db) * np.hanning(40) / 20)
    return ring(push, LURCH, 0, 1)


# (frequency [Hz], side re mid [dB])
PORT_GAP = [(60, -20.5), (180, -32.5), (550, -38.5), (1650, -26.5), (4970, -1), (15000, -8.5)]
PLATE_ECHO_DB, HAND_ECHO_DB = -9, -6.5


def scene():
    box, held_plate = blows()
    box, hand = box + ticks(), touch()
    for sound in [dial(*r) for r in RUNS] + [drone()] + [spring(*r) for r in SPRINGS]:
        add(box, *sound)
    direct = box + held_plate + nominal_scale(0.8) * hand
    shaded = box + nominal_scale(PLATE_ECHO_DB) * held_plate + nominal_scale(HAND_ECHO_DB) * hand
    direct, shaded = high_pass([direct, shaded], 3, 105)
    near = rng.standard_normal(300) * np.exp(-np.arange(300) / 70)
    gap = signal.oaconvolve(direct, near / np.linalg.norm(near))[:N]
    gap = nominal_scale(-25.5) * colour(gap, PORT_GAP)
    return direct + np.outer([1, -1], gap) + walls(shaded) + air() + insect() + lurches()


def low_pass(x):
    return signal.sosfilt(signal.butter(12, 16510, fs=SR, output="sos"), x)


def record(dry):
    limited = signal.oaconvolve(dry, signal.firwin(255, 16000, fs=SR)[None], "same")
    guarded = np.clip(limited, -1, 1)
    finished = signal.oaconvolve(guarded, signal.firwin(255, 16350, fs=SR)[None], "same")
    return low_pass(finished)


dry = scene()
out = record(dry)
wav_record(out)
```